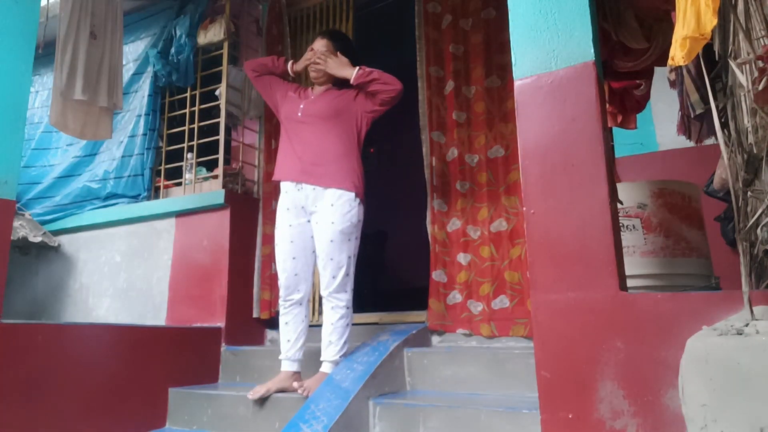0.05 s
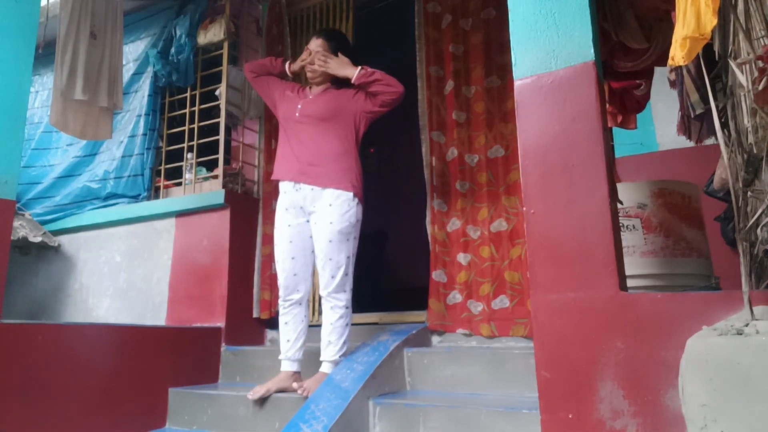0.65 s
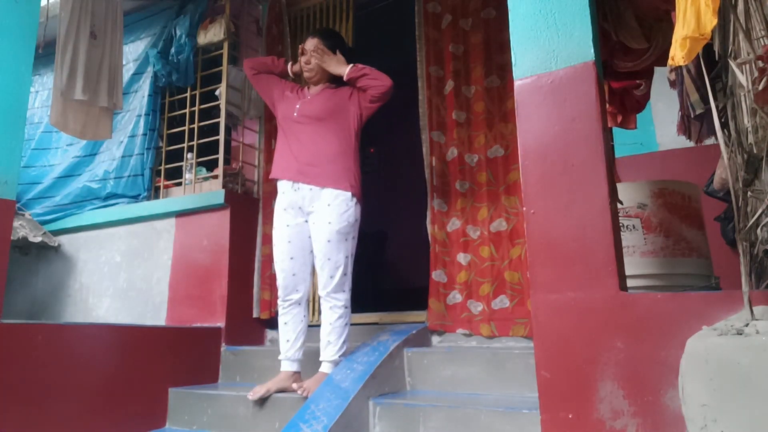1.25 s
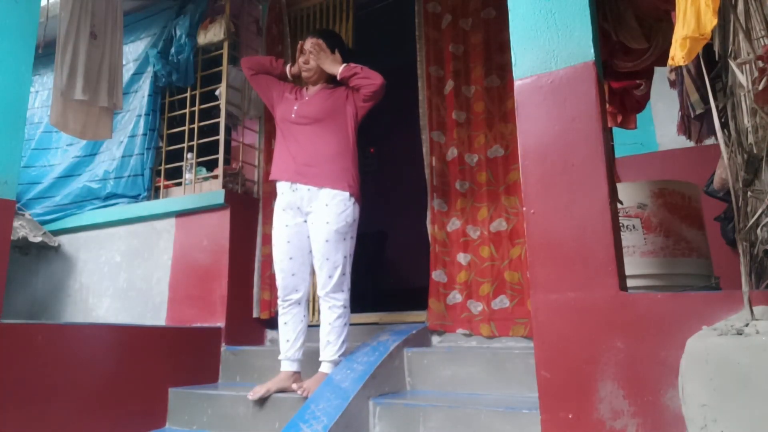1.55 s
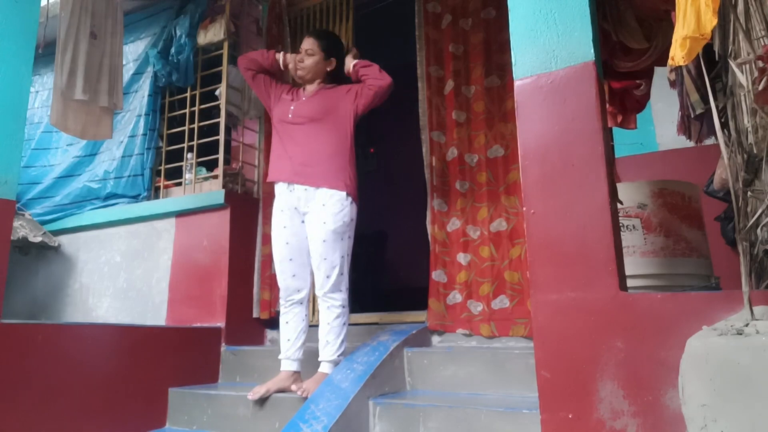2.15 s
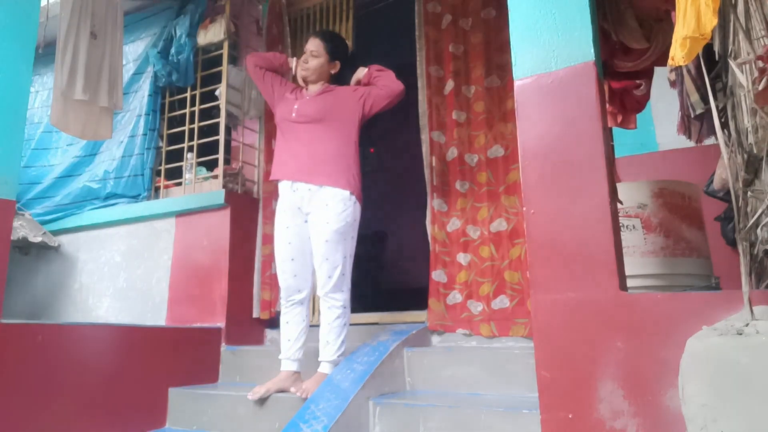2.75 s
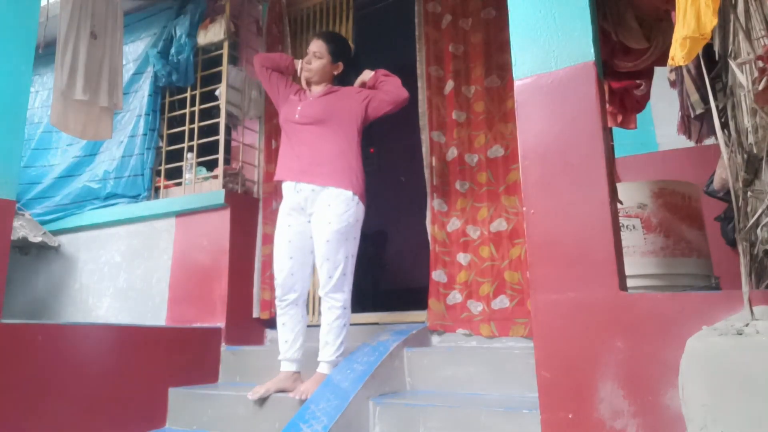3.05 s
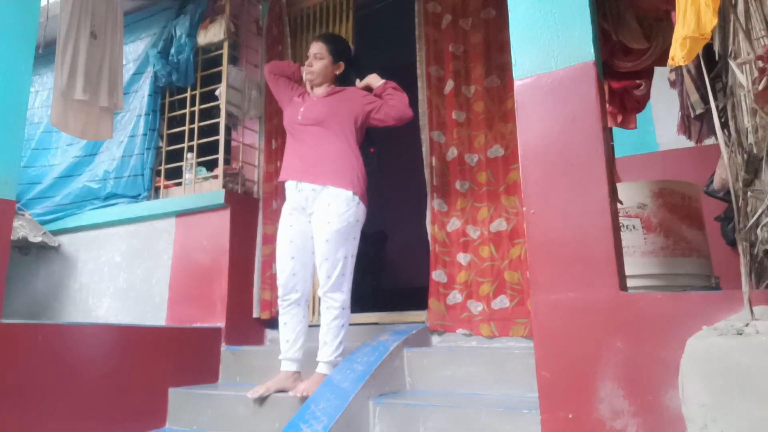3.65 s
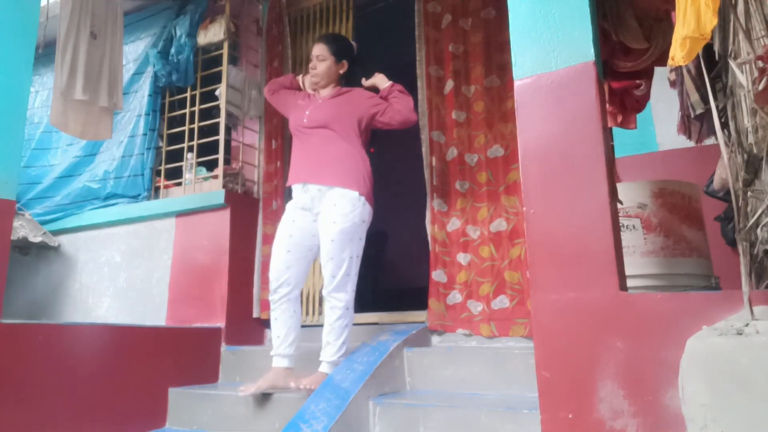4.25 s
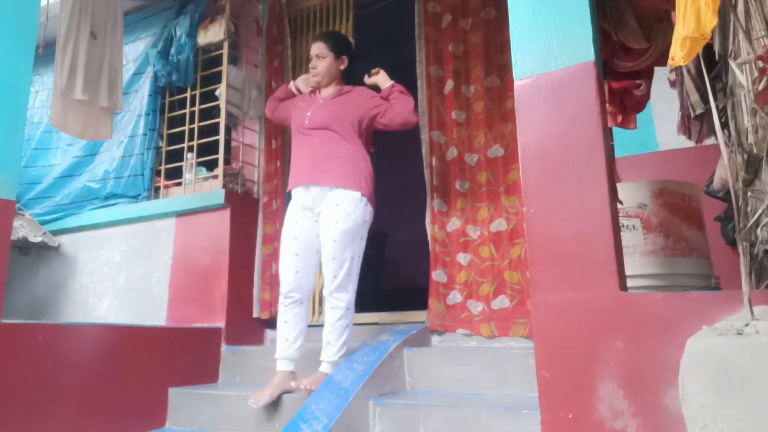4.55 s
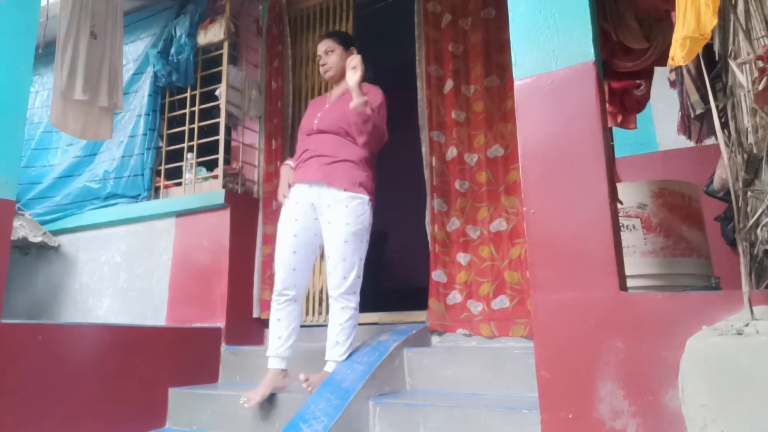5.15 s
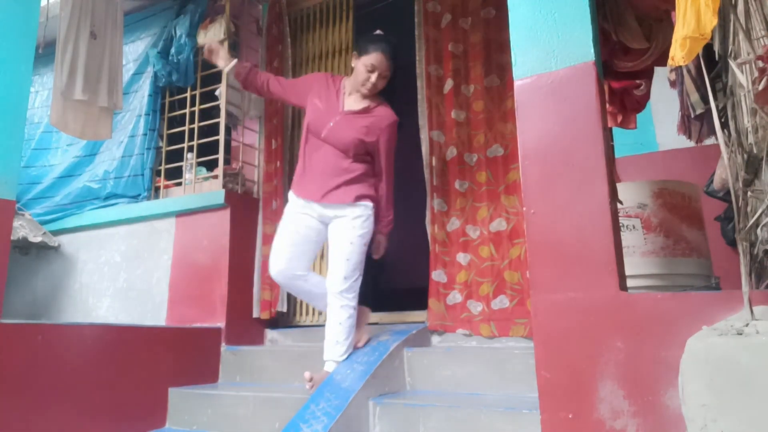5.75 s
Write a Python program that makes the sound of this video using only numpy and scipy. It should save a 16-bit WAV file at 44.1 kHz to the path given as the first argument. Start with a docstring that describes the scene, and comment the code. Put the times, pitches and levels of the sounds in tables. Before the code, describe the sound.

Village birds whistle, hoot and chirp over a low distant traffic rumble, and bangles clink near the end.

```python
"""A village yard. A low rumble of far traffic and a thin hiss run throughout, with faint twittering.
First a far bird hoots, while others rasp, call and whistle among echoing houses, and one starts to pip.
About a second in, a nearer songbird whistles a winding phrase. The rumble booms softly now and then,
and near four seconds a bird gives one long buzz. Near the end, as the rumble grows, bangles clink
on a moving wrist and ring briefly in the porch."""
import sys
import numpy as np
from scipy import signal
from scipy.fft import rfft, irfft
from scipy.io import wavfile
from scipy.ndimage import uniform_filter1d

SR = 44100
rng = np.random.default_rng(int(sys.argv[2]) if len(sys.argv) > 2 else 0)


def put_to_file(sound):
    """Save the sound as 16-bit audio at rate SR, in the file named by the first command-line argument."""
    columns = np.atleast_2d(sound).T  # one column per channel
    safe = np.clip(columns, -1, 1)
    whole_steps = np.round(safe * 32767)
    wavfile.write(sys.argv[1], SR, whole_steps.astype(np.int16))


N = 260631
T = np.arange(N) / SR


def undb(db):
    """Turn decibels into a gain."""
    return 10 ** (np.asarray(db) / 20)


def unit(x):
    """Scale a sound so its average strength (rms) is 1."""
    return x / np.sqrt(np.mean(x ** 2) + 1e-20)


def pan(db):
    """Left and right gains that make the left side louder by db."""
    return undb(np.array([[db], [-db]]) / 2)


def add(out, start_s, sound):
    """Mix a sound in at its start time."""
    i = max(int(start_s * SR), 0)
    out[..., i:i + sound.shape[-1]] += sound[..., :max(N - i, 0)]


def walk(rate_hz, size):
    """A smooth random wobble, mostly between -1 and 1."""
    hold = max(int(SR / rate_hz), 1)
    steps = np.repeat(rng.standard_normal(size // hold + 2), hold)
    return 1.34 * uniform_filter1d(uniform_filter1d(steps, hold), hold)[:size]


def noise(hz, db):
    """Noise shaped to the given level at each frequency."""
    freqs = np.maximum(np.fft.rfftfreq(N, 1 / SR), 1)
    gains = undb(np.interp(np.log(freqs), np.log(hz), db))
    return irfft(rfft(rng.standard_normal(N)) * gains, N)


def echo(sound, fade_s, wet_db, delay_s, count, lead_ms=0):
    """The direct sound, lead_ms earlier on the right, then wall echoes that fall 60 dB in fade_s."""
    out = []
    for side, late_ms in zip(np.broadcast_to(sound, (2, N)), (lead_ms, -lead_ms)):
        lag_s = rng.random(count) * fade_s
        bounces = rng.standard_normal(count) * undb(-60 * lag_s / fade_s)
        paths = np.zeros(int((fade_s + delay_s) * SR) + 2)
        np.add.at(paths, ((lag_s + delay_s) * SR).astype(int), bounces)
        paths *= undb(wet_db) / np.linalg.norm(paths)
        paths[int(max(late_ms, 0) * SR / 1000)] += 1  # the direct path
        out.append(signal.fftconvolve(side, paths / np.linalg.norm(paths))[:N])
    return np.array(out)


def whistle(hz, gain, waver, flutter_db=2.5):
    """A nearly pure tone whose pitch and strength tremble."""
    trembling_hz = hz * (1 + waver * walk(190, len(hz)))
    phase = 2 * np.pi * np.cumsum(trembling_hz) / SR
    return np.sqrt(2) * np.sin(phase) * gain * undb(flutter_db * walk(51.4, len(hz)))


def syllable(length_s, start_hz, middle_hz, end_hz, db, waver=0.0069):
    """A short note that curves through three pitches."""
    progress = np.linspace(0, 1, int(length_s * SR))
    curve = np.polyfit([0, .5, 1], [start_hz, middle_hz, end_hz], 2)
    gain = undb(db) * signal.windows.tukey(len(progress), .5)
    return whistle(np.polyval(curve, progress), gain, waver)


def rumble():
    """Far traffic and village noise; the deepest part is alike on both sides."""
    # the rumble's tone, from low to high: frequency_hz, relative_db
    spectrum = [(12, -46), (20, -6.5), (60, 1), (106, 1), (139, -6), (174, -6), (252, -16), (330, -19.5),
                (414, -25), (451, -23), (559, -30), (600, -29.5), (780, -39), (1320, -120)]
    # how it grows toward the end: time_s, relative_db
    growth = [(0.0, -54), (2.21, -50), (3.82, -51), (5.69, -45), (5.91, -44.5)]
    hz, db = np.transpose(spectrum)
    time_s, level_db = np.transpose(growth)
    side_db = np.interp(np.log(hz), np.log([87, 199, 380, 600]), [-20.5, -11, -9, -7.0])
    middle = noise(hz, db)
    sides = noise(hz, db + side_db) * np.array([[1], [-1]])
    return unit(middle + sides) * undb(np.interp(T, time_s, level_db))


def hiss(level_db=-61.5, drift_db=0.45):
    """A steady thin hiss of air and microphones, unrelated left and right."""
    # the hiss's tone on each side, as relative levels: frequency_hz, left_db, right_db
    spectrum = [(247, -3, -15), (607, 4, 1.5), (1120, -0.5, 2), (1670, -2.5, -3.5), (2460, 3, 2),
                (3380, -2.5, -4), (4090, -5, -8), (4890, 0.5, -8.5), (5590, -3.5, -13), (6780, 6.5, -21),
                (7430, -18.5, -20.5), (12000, -16, -14.5), (14600, -11.5, -26)]
    hz, left_db, right_db = np.transpose(spectrum)
    both_sides = np.array([noise(hz, left_db), noise(hz, right_db)])
    return unit(both_sides) * undb(level_db + drift_db * walk(8.3, N))


def hoot(length_s, hz, db, attack_s=.075, release_s=.035):
    """One hoot: the pitch scoops up as the effort builds, then pitch and strength sink."""
    scoop_hz, sag_hz_per_s, fade_db_per_s = 69.4, 290, 19
    t = T[:int(length_s * SR)]
    effort = np.clip(t / attack_s, 0, 1)
    release = np.clip((length_s - t) / release_s, 0, 1)
    pitch_hz = hz - scoop_hz * (1 - effort) - sag_hz_per_s * t
    return whistle(pitch_hz, effort * release * undb(db - fade_db_per_s * t), waver=0.025)


def hoots(hoarse=0.19, throb_hz=80, throb_depth=0.35):
    """A far bird hoots, slightly hoarse and roughened by a fast throb; its echoes overlap."""
    # low hoots, before each one sinks: start_s, length_s, pitch_hz, level_db
    notes = [(0.027, .19, 704.5, -50), (.65, 0.22, 730.5, -49.5), (.82, 0.366, 750.3, -47.5),
             (1.28, 0.085, 621, -56.5)]
    out = np.zeros(N)
    for start_s, length_s, hz, db in notes:
        add(out, start_s, hoot(length_s, hz, db))
    out *= 1 + hoarse * walk(170, N) + throb_depth * np.sin(2 * np.pi * throb_hz * T)
    return echo(out, fade_s=.9, wet_db=-1.0, delay_s=.012, count=400, lead_ms=0.36) * pan(db=-1.7)


def harsh_note(length_s, hz, db, width_hz):
    """A fast, uneven trembling smears a tone into a soft rasp."""
    size = int(length_s * SR)
    tremble = walk(2 * width_hz, size) + 1j * walk(2 * width_hz, size)
    rasp = np.real(tremble * np.exp(2j * np.pi * hz * T[:size]))
    return unit(rasp) * undb(db) * signal.windows.tukey(size, .6)


def chatter(chip_every_s=.215):
    """Harsh-voiced birds on the left: single low rasps, runs of high chips and one long buzz."""
    # short low rasps: start_s, pitch_hz, level_db
    rasps = [(.15, 2400, -70), (.55, 2350, -67), (1.079, 2350, -59), (1.212, 2430, -64.5),
             (1.81, 2450, -65.5), (5.194, 2774, -58), (5.638, 2755, -59.5)]
    # runs of evenly spaced hoarse chips: start_s, chip_count, pitch_hz, level_db
    chip_runs = [(1.073, 4, 5210, -68), (2.716, 6, 4880, -73.5)]
    out = np.zeros(N)
    for start_s, count, hz, db in chip_runs:
        for k in range(round(count)):
            add(out, start_s + k * chip_every_s, harsh_note(length_s=.097, hz=hz, db=db, width_hz=510))
    for start_s, hz, db in rasps:
        add(out, start_s, harsh_note(length_s=.032, hz=hz, db=db, width_hz=330))
    buzz = harsh_note(length_s=.52, hz=4170, db=-65, width_hz=760)
    add(out, start_s=3.89, sound=buzz)
    return echo(out, fade_s=.45, wet_db=-1.5, delay_s=0.011, count=300) * pan(db=11.0)


def rising_whistle(pitch_factor, db, length_s=.48, swell_db=9):
    """One slow whistle that grows louder as it climbs, then drops in pitch at the very end."""
    low_hz, high_hz, drop_hz = pitch_factor * np.array([1295, 1628, 300])
    climb_at_s, climb_s, drop_s = .26, 0.0347, .07
    t = T[:int(length_s * SR)]
    climb = 1 / (1 + np.exp((climb_at_s - t) / climb_s))  # a smooth step from 0 to 1
    drop = np.clip(1 - (length_s - t) / drop_s, 0, 1)
    hz = low_hz + (high_hz - low_hz) * climb - drop_hz * drop
    gain = undb(db + swell_db * (climb - 1)) * signal.windows.tukey(len(t), .2)
    return whistle(hz, gain, waver=0.012)


def far_birds(start_below_hz=71.3, end_below_hz=140, rise_boost_db=1.1):
    """Stray arching calls and slow rising whistles from the surrounding trees."""
    # single calls: start_s, length_s, pitch_hz, level_db, left_minus_right_db
    calls = [(0.257, 0.05, 4020, -71, 6), (1.034, .087, 3347, -66.5, -10), (1.348, .039, 2750, -63.5, 3),
             (2.60, 0.21, 2165, -56, 8), (2.832, 0.092, 2100, -64.5, -5), (5.86, 0.051, 5130, -69, 11)]
    # rising whistles: start_s, pitch_factor, relative_db
    rises = [(.26, .965, -69), (2.68, 1, -63), (5.20, 1.012, -63)]
    out = np.zeros((2, N))
    for start_s, length_s, hz, db, side_db in calls:
        call = syllable(length_s, hz - start_below_hz, hz, hz - end_below_hz, db)
        add(out, start_s, call * pan(side_db))
    for start_s, pitch_factor, db in rises:
        add(out, start_s, rising_whistle(pitch_factor, db + rise_boost_db) * pan(db=-4.5))
    return echo(out, fade_s=.65, wet_db=1.0, delay_s=0.011, count=400)


def twitter(notes_per_s=9, low_hz=1900, high_hz=3900, level_db=-76, length_s=.06, max_bend=0.0397):
    """Birds in farther trees drop faint, echoing, bent notes at random moments."""
    out = np.zeros((2, N))
    for when, height, bend, strength, side in rng.random((int(notes_per_s * N / SR), 5)):
        hz = low_hz + (high_hz - low_hz) * height
        slide_hz = hz * max_bend * (2 * bend - 1)
        db = level_db + 6 * (strength - .5)
        note = syllable(length_s, hz - slide_hz, hz, hz + slide_hz, db, waver=.015)
        add(out, when * N / SR, note * pan(db=12 * (side - .5)))
    return echo(out, fade_s=.6, wet_db=0.5, delay_s=.015, count=300)


def pips():
    """One far bird repeats a rounded, slightly falling pip."""
    # almost evenly spaced pips: start_s, level_db
    notes = [(.638, -61), (1.307, -56), (1.967, -56), (2.61, -57.5), (3.308, -56), (4.076, -62),
             (4.817, -59.5), (5.509, -58)]
    out = np.zeros(N)
    for start_s, db in notes:
        note = syllable(length_s=.07, start_hz=1290, middle_hz=1250, end_hz=1205, db=db)
        add(out, start_s, note * np.hanning(len(note)))
    return echo(out, fade_s=.5, wet_db=-13.0, delay_s=.02, count=300, lead_ms=0.25) * pan(db=3.0)


def songbird():
    """The nearest bird warbles one winding phrase, a little to the left."""
    # the notes of the song: start_s, length_s, start_hz, middle_hz, end_hz, relative_db
    phrase = [(.872, .22, 4880, 4970, 5120, -68), (1.10, .12, 4680, 4590, 4510, -62),
              (1.175, .27, 4560, 4170, 3800, -52), (1.555, .064, 3700, 4073, 3960, -46.5),
              (1.645, .115, 3850, 4020, 3650, -48.5), (1.814, .096, 4470, 4500, 4580, -56.5),
              (1.977, .095, 5000, 4730, 4750, -59.5), (2.04, .055, 4300, 3660, 3640, -51.5),
              (2.111, .052, 3570, 3405, 3500, -54.5), (2.219, .135, 3780, 3660, 3150, -51),
              (2.395, .06, 3710, 3660, 3620, -54), (2.437, .16, 4260, 3805, 4720, -52.5),
              (2.568, .053, 4620, 4690, 4770, -60), (2.612, .066, 3850, 4070, 4600, -62)]
    out = np.zeros(N)
    for start_s, *note in phrase:
        add(out, start_s, syllable(*note, waver=.009))
    return echo(out, fade_s=.55, wet_db=.5, delay_s=.008, count=400, lead_ms=-.43) * pan(db=3.2)


def swells():
    """The rumble booms a little now and then."""
    # brief low wavering tones: start_s, length_s, pitch_hz, level_db
    booms = [(2.0, 0.11, 162.7, -50), (2.39, 0.09, 163, -54), (4.171, 0.071, 199.5, -52.5),
             (5.141, 0.14, 77.8, -44.5), (5.608, 0.128, 68.3, -45)]
    out = np.zeros(N)
    for start_s, length_s, hz, db in booms:
        add(out, start_s, syllable(length_s, hz, hz, hz, db, waver=0.055))
    return out


def bangles(crack_db=-24, low_tones_below_hz=8000, build_share=0.33, right_cutoff_hz=11000):
    """Bangles knock together; each touch rattles briefly and makes them ring, and the porch echoes."""
    # the touches: start_s, level_db, low_tones_db, contact_s
    clinks = [(4.531, -60.5, -2, 0.029), (5.133, -34.5, 1, 0.0086), (5.198, -53, 6, 0.0064),
              (5.418, -38, 1.5, 0.0083), (5.443, -37, -6, 0.0049), (5.461, -18, -3.5, 0.0021),
              (5.714, -52.5, -5, 0.0052), (5.747, -43.5, -22, 0.008), (5.7853, -34.5, -4.5, 0.0079)]
    # the tones the bangles ring at: pitch_hz, width_hz, relative_db
    ring_tones = [(2920, 510, -16.5), (3810, 520, -21), (5660, 340, -9.5), (6160, 410, -8),
                  (6500, 330, -13.5), (9900, 840, -14.5), (10800, 430, -12.5), (11800, 320, -10),
                  (12100, 480, -18), (13000, 530, -8.5), (14300, 340, -9), (14290, 130, -1.5),
                  (14300, 130, -4), (15040, 280, 0), (15200, 170, 0.5), (15900, 140, 1.5)]
    out, size = np.zeros((2, N)), 8192
    t, freqs = T[:size], np.fft.rfftfreq(size, 1 / SR) + 1
    hz, width_hz, tone_db = np.transpose(ring_tones)[:, :, None]
    resonances = 1 / (1 + 1j * hz / width_hz * (freqs / hz - hz / freqs))
    # thin rings give off no low sound
    low_cut = signal.freqs(*signal.butter(4, 2900, "highpass", analog=True), freqs)[1]
    for start_s, db, low_tones_db, contact_s in clinks:
        # where the bangles touch decides how strongly the lower tones ring
        tone_gains = undb(tone_db + low_tones_db * (hz < low_tones_below_hz))
        body = low_cut * ((tone_gains * resonances).sum(axis=0) + undb(crack_db))
        body /= np.sqrt(np.mean(abs(body) ** 2))
        build_up = np.minimum(t / (build_share * contact_s), 1)
        force = rng.choice([-1, 1], size) * np.exp(-t / contact_s) * build_up
        force /= np.std(force[t < .01])
        ring = irfft(rfft(force) * body)[:size // 2]
        add(out, start_s, ring * undb(db) * pan(db=7.5))
    # the right microphone faces away and misses the highest ring
    out[1] = signal.lfilter(*signal.butter(2, right_cutoff_hz, fs=SR), out[1])
    return echo(out, fade_s=.19, wet_db=-1.5, delay_s=0.0033, count=700)


def scene():
    """Mix the birds and bangles with the rumble and hiss."""
    birds = undb(0.83) * songbird() + far_birds() + pips() + hoots() + chatter()
    return birds + bangles() + undb(.5) * rumble() + swells() + hiss() + twitter()


def record(dry, cutoff_hz=15850):
    """The recorder cuts off the highest treble."""
    return signal.sosfilt(signal.ellip(10, .2, 80, cutoff_hz, fs=SR, output="sos"), dry)


dry = scene()
out = record(dry)
put_to_file(out)
```